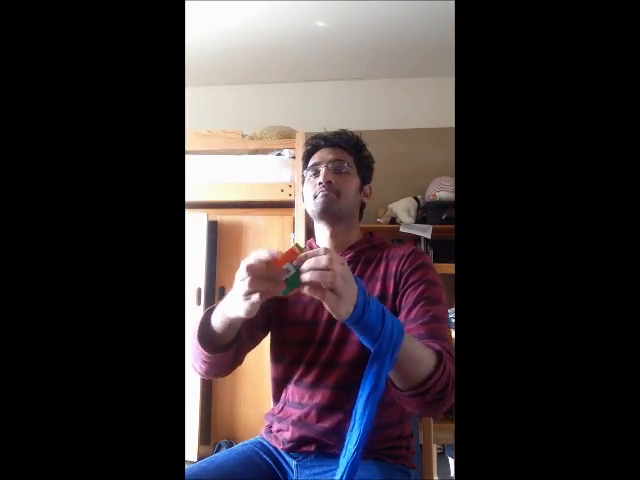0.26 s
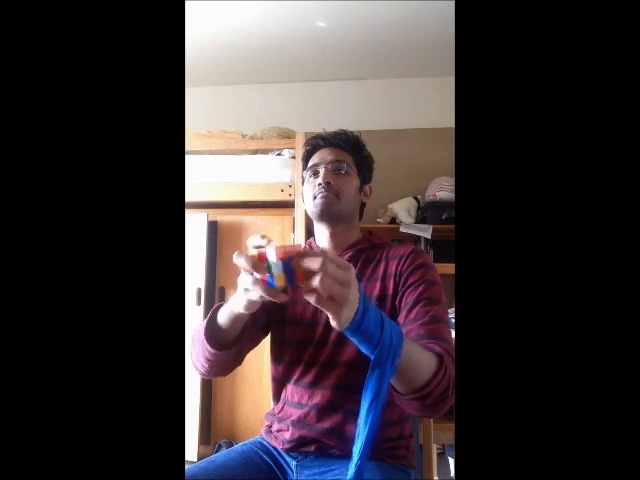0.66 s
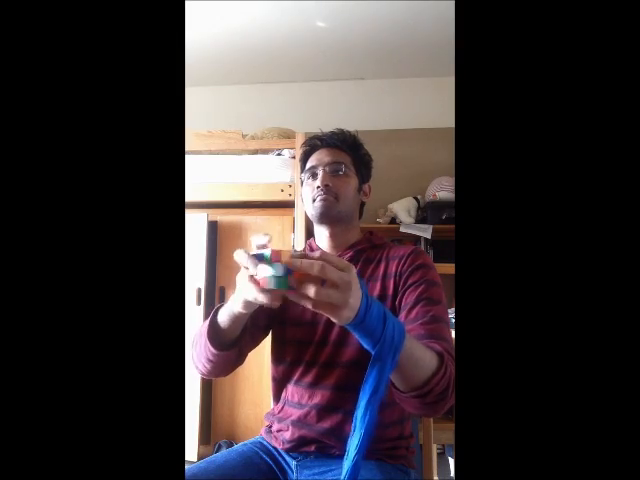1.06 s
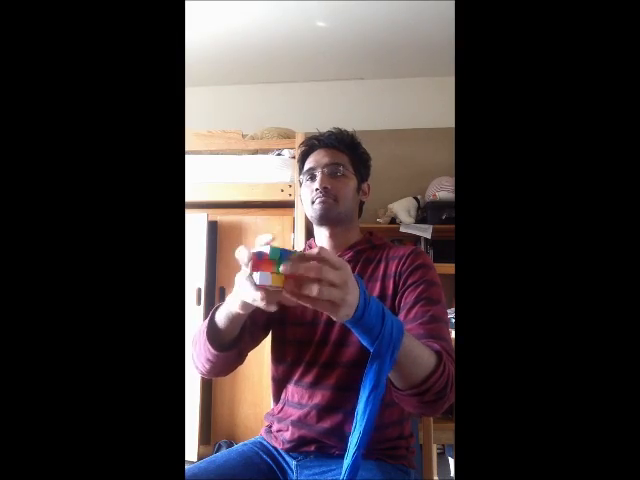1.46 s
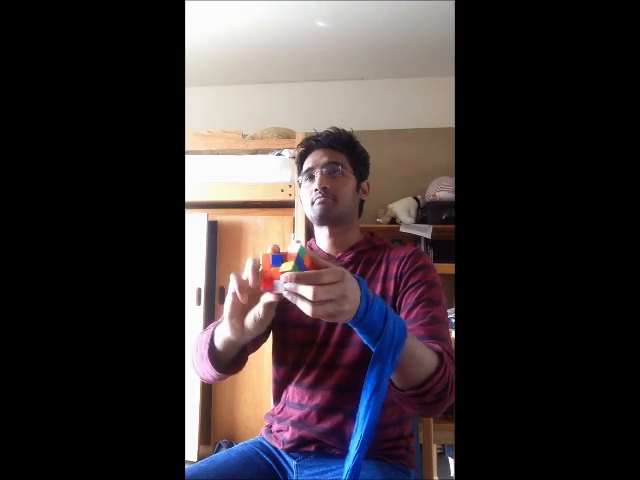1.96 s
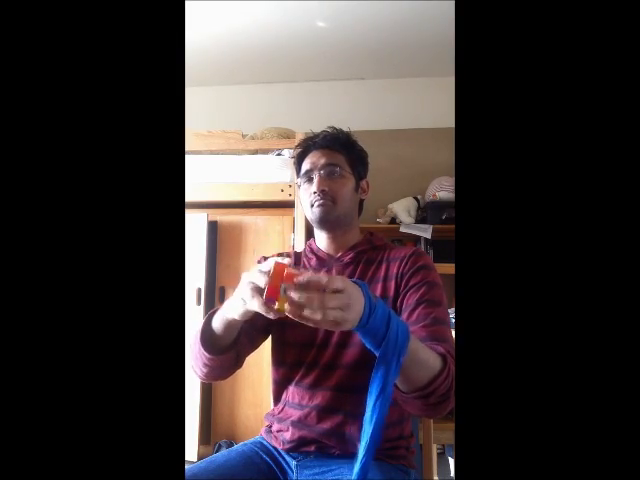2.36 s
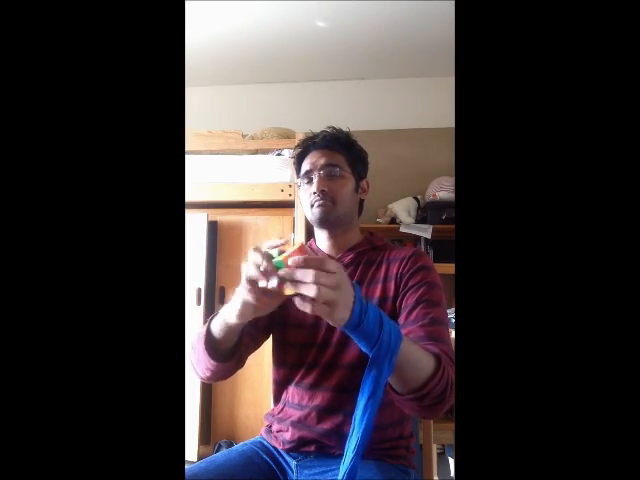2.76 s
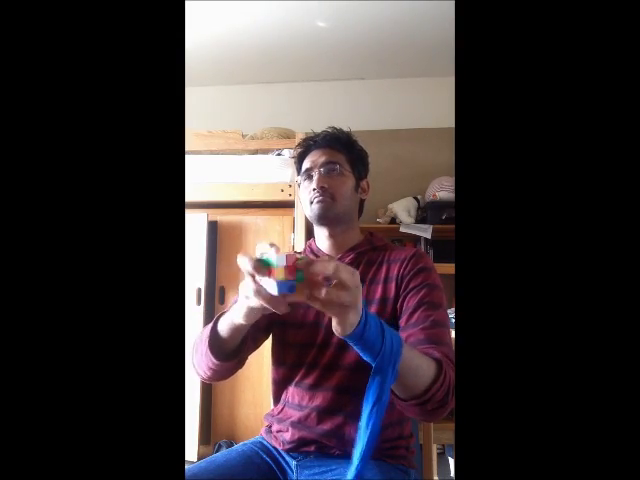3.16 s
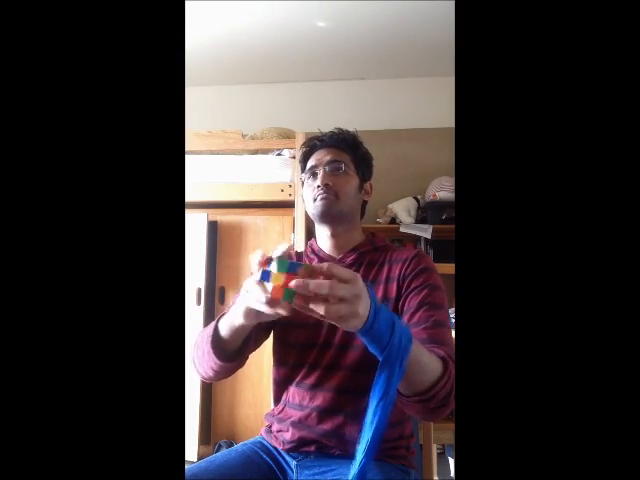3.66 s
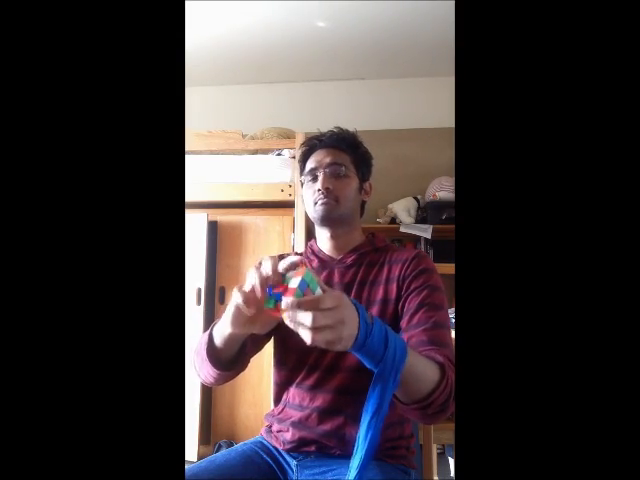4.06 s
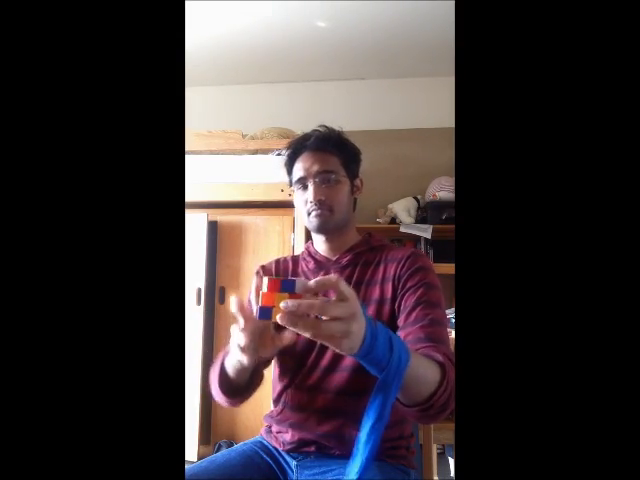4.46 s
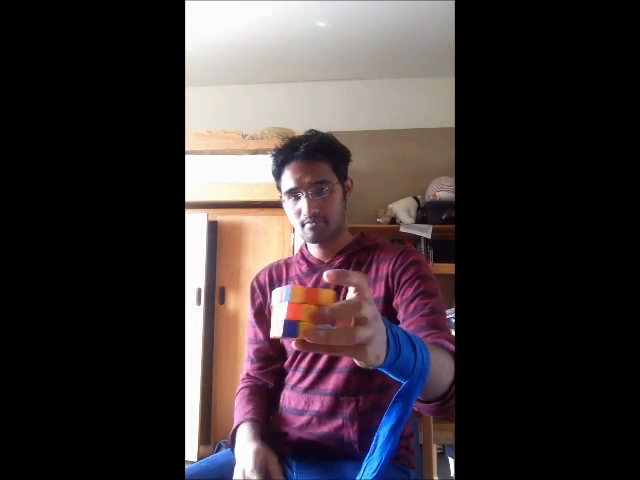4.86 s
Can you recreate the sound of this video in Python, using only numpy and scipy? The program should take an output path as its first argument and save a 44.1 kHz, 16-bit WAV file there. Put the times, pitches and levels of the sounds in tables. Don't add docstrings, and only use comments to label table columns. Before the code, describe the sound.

A hollow plastic puzzle cube is twisted quickly by hand about a metre from a phone in a small furnished room. It opens with two sharp ticks, then from 0.3 to 1.7 s come fast clusters of snaps, clacks and rattles with gritty sliding between them, strong at 0.6, 1.1 and 1.6 s. Around 1.8 to 2.25 s it thins to lighter clicks and finger touches. A very sharp tick lands at 2.45 s, followed by dense clacking to 2.95 s with a soft dull hand bump near 2.74. After a lighter pause, another hard burst comes at 3.5 to 3.8 s. Spaced locks follow, then one bright, loud clack at 4.72 s and small fading ticks to about 5 s. Thin spring pings appear occasionally, including a high one near 4.4 s. Close echoes and a short room tail blend into faint ventilation hum and steady hiss.

```python
import sys
import numpy as np
from scipy import signal
from scipy.fft import rfft, irfft
from scipy.io import wavfile
from scipy.ndimage import uniform_filter1d

SR = 44100
rng = np.random.default_rng(int(sys.argv[2]) if len(sys.argv) > 2 else 0)


def generate_wav(signal):
    frames = np.transpose(np.atleast_2d(signal))
    scaled = np.clip(frames, -1, 1) * 32767
    pcm = np.round(scaled).astype(np.int16)
    wavfile.write(sys.argv[1], SR, pcm)


def gain_from_db(level_db):
    decades = np.asarray(level_db, float) / 20
    return 10 ** decades


N = 225792


def shape(x, hz, db):
    log_hz = np.log(np.fft.rfftfreq(len(x), 1 / SR) + 1)
    return irfft(rfft(x) * gain_from_db(np.interp(log_hz, np.log(hz), db)), len(x))


def unit(x):
    return x / np.sqrt(np.mean(x ** 2))


def walk(rate):
    hold = int(SR / rate)
    steps = np.repeat(rng.standard_normal(N // hold + 1), hold)
    return unit(uniform_filter1d(uniform_filter1d(steps, hold), hold)[:N])


def fade(t, t60):
    return np.exp(-np.log(1000) * t / t60)


def add(out, s, x):
    i = max(int(s * SR), 0)
    out[i:i + len(x)] += x[:len(out) - i]


# f/Hz, density/dB per Hz
AIR_COLOUR = [(25, -32), (60, -21), (80, -25.5), (125, -8.5), (200, -5), (265, 2), (330, -3.5), (420, -7.5),
              (800, -10.5), (1300, -13), (2200, -18.5), (4000, -22.5), (9000, -22), (15000, -27)]
# f/Hz, level/dB
MOTOR_LINES = [(269.2, -71), (360.2, -73.5), (890, -75.5)]


def air():
    noise = unit(shape(rng.standard_normal(N), *np.transpose(AIR_COLOUR)))
    rumble = shape(noise, [500, 900], [0, -60])
    waver = gain_from_db(0.21 * walk(4.82)) - 1
    out = gain_from_db(-58.5) * (noise + rumble * waver)
    for hz, db in MOTOR_LINES:
        phase = 2 * np.pi * np.cumsum(hz * (1 + 0.00195 * walk(3.4))) / SR
        out = out + gain_from_db(db + 1.5 + 2 * walk(2.39)) * np.sin(phase)
    return out


# delay t/s, level/dB
NEAR_WALLS = [(.0028, -9.5), (.0046, -8.5), (.0082, -16.5), (0.013, -16.5)]
# f/Hz, t60/s, level/dB
ROOM_TAIL = [(477, 0.16, -28), (1296, 0.21, -32.5), (2850, 0.17, -31), (5550, 0.18, -32), (8660, 0.19, -35),
             (12900, 0.089, -34)]


def room(x, poses=6):
    t = np.arange(SR // 2) / SR
    hz = [band[0] for band in ROOM_TAIL]
    log_hz = np.log(np.fft.rfftfreq(len(t), 1 / SR) + 1)
    swell = 1 - np.exp(-t / 0.00071)
    pose = np.arange(N) // 1500 % poses
    out = x
    for k in range(poses):
        paths = np.zeros(len(t))
        scatter = rfft(rng.standard_normal(len(t)))
        for s, db in NEAR_WALLS:
            add(paths, s * (1 + .08 * rng.standard_normal()), gain_from_db(db) * np.array([.6, .4, -.3]))
        for j, (_, t60, db) in enumerate(ROOM_TAIL):
            share = np.interp(log_hz, np.log(hz), np.arange(len(hz)) == j)
            paths = paths + gain_from_db(db) * irfft(scatter * share, len(t)) * fade(t, t60) * swell
        sent = x * uniform_filter1d(1. * (pose == k), size=200)
        out = out + signal.fftconvolve(sent, paths)[:N]
    return out


# t/s, length/s, level/dB
HAND_BUMP = (2.738, .03, -50)
# f/Hz, level/dB
HAND_COLOUR = [(150, -28), (215, 1), (260, 3), (330, -27), (700, -16), (900, -4), (1100, -23), (1800, -9),
               (2400, -45)]


def bump():
    s, length, db = HAND_BUMP
    thud = unit(shape(rng.standard_normal(N), *np.transpose(HAND_COLOUR)))
    swell = np.exp(-((np.arange(N) / SR - s) / length) ** 2)
    return gain_from_db(db) * swell * thud


# t/s, f/Hz, level/dB, t60/s
SPRING_PINGS = [
    (.01, 9490, -56, .2),
    (4.415, 9290, -58, .6),
    (4.415, 8620, -60, .2),
    (4.72, 7700, -54, .2),
    (2.313, 2250, -51, .2),
    (2.93, 3750, -46, .1),
    (.508, 2250, -45, .1),
    (2.28, 2200, -54, .2),
    (1.346, 2200, -44, .05),
]


def springs():
    out = np.zeros(N)
    t = np.arange(int(.115 * SR)) / SR
    for s, hz, db, t60 in SPRING_PINGS:
        add(out, s, gain_from_db(db) * fade(t, t60) * np.sin(2 * np.pi * hz * t))
    return out


# t/s, rise by 10 dB/ms, fall by 10 dB/ms, level/dB, brightness/dB
LAYER_TWISTS = [(.01, 21, 300, -51.5, -1.5), (.5, 90, 100, -54, 3), (.635, 15, 80, -48.5, 2),
                (0.752, 92, 28, -51, 3.5), (.96, 53, 64, -49, 3), (.855, 8, 60, -61, -1),
                (1.16, 50, 65, -48, 4), (1.35, 6, 112, -46, 4), (1.61, 100, 95, -51, 3.5),
                (1.815, 25, 170, -54, 3), (2.32, 30, 80, -61, 7.5), (2.459, 16, 86, -51, 6.5),
                (2.555, 10, 60, -43, -2), (2.64, 60, 150, -55.5, -5), (2.938, 115, 63, -44, 1.5),
                (3.06, 50, 450, -60.5, 1), (3.52, 100, 80, -58, 5), (3.609, 35, 84, -48.5, 7),
                (3.761, 19, 102, -45, 3), (4.02, 53, 45, -49.5, -2.5), (4.2, 60, 209, -63.5, 2),
                (4.41, 26, 53, -61, 11.5), (4.73, 23, 49, -61.5, 15), (4.9, 15, 140, -66, 2)]


def twisting():
    s, rise, fall, level_db, bright_db = np.transpose(LAYER_TWISTS)[:, :, None]
    t = np.arange(0, N + 64, 64) / SR
    body_db = level_db - 10 ** 4 * np.maximum((s - t) / rise, (t - s) / fall)
    gains = []
    for db in (body_db, body_db + bright_db):
        total = np.sqrt(np.sum(gain_from_db(2 * db), axis=0))
        gains.append(np.interp(np.arange(N) / SR, t, total))
    return gains


def slide():
    slip_rate, size_db, flutter_db, smooth = 1000., 5., 2., .45
    body_gain, edge_gain = twisting()
    coin = rng.random((3, N))
    size = gain_from_db(-size_db * np.log(coin[2] + .05))
    slips = (coin[0] < slip_rate / SR) * np.sign(coin[1] - .5) * size
    grains = irfft(np.exp(2j * np.pi * rng.random((9, 25))))
    face = np.arange(N) // 97 % len(grains)
    slips = sum(signal.fftconvolve(slips * (face == k), grain)[:N] for k, grain in enumerate(grains))
    rub = (unit(slips) + smooth * rng.standard_normal(N)) * gain_from_db(flutter_db * walk(40))
    body = shape(rub, [400, 900, 1400, 2150, 2600, 3200, 4500, 6500],
                 [-2.5, -4.0, -2.0, 5.5, 0.5, 0.5, -3.5, -28.0])
    edge = shape(rub, [3960, 6950, 9150, 11300, 14800], [-14.5, -5.5, -10.5, -15, -12.5])
    return gain_from_db(-3.5) * (body_gain * unit(body) + edge_gain * unit(edge))


# t/s, peak level/dB, brightness/dB, rattle/dB
FACE_CLACKS = [(.331, -33.5, -2, -9), (3.4138, -39, -1, -14), (3.001, -37, 6, -10), (.4649, -28, 11, -4),
               (.6205, -23, 4.5, 0), (.6713, -29.5, -1, -13), (.9132, -23.5, -8, -5.5),
               (1.477, -34, 30.5, -13), (1.5375, -28.5, -4, -5), (1.5504, -28, 0, 0),
               (1.6114, -15, -2, -21), (1.729, -33.5, 8, -12), (2.3993, -31.5, -6.5, -6),
               (2.554, -21.5, 12, -13), (2.6423, -30.5, 5.5, 3), (2.8409, -31, -5.5, -0.5),
               (2.8706, -30.5, 3, -9), (2.9071, -28, 2, 0.5), (2.908, -28, 0, -11), (2.9291, -24, 3, -1),
               (2.9472, -23, -2, -1.5), (3.6023, -23, 8, 2), (3.7497, -21, 2, 2), (3.7793, -17, 4, -3),
               (3.8676, -34, 5, -18), (3.9384, -34, 4, -4), (4.7196, -15, 13, -19), (4.8853, -34, -1, -3),
               (4.9737, -33.5, -6, -9), (5.0533, -37, 2.5, -7)]
# t/s, peak level/dB, brightness/dB,
# rattle/dB
LAYER_LOCKS = [(.4875, -25.5, -6.5, -6), (.5077, -30, -8, 0), (.5511, -25, -1, -8), (.7427, -23, -0.5, -14),
               (.8449, -31, 0, -2.5), (1.0999, -20, 1, -4), (1.1006, -18.5, 0.5, 0), (1.1024, -21, 6.5, -6),
               (1.1414, -17, -9, -10), (1.1549, -21, -3, -2.5), (1.946, -28, -6.5, -16.5),
               (2.3124, -30.5, -5, -3), (2.8066, -33.5, 7, 2.5), (3.4863, -24, 2, -7.5),
               (3.533, -28, -1, 1.5), (3.7516, -17, 3.5, -0.5), (3.8269, -25, 2.5, -2),
               (4.0238, -30.5, -4, -4), (4.1773, -23, -4, -39.5), (4.3934, -27, 1, 4),
               (4.6767, -33.5, -6, -8), (4.6892, -32, -4, -10), (4.1614, -42, 5, -14),
               (4.358, -45.5, -12, -3), (4.2837, -39, -14, -9), (1.9053, -42, 16, -19), (4.067, -44, 8, -4),
               (2.0434, -46, 5, -16), (1.091, -39, -9, -2), (3.3123, -47, -1.5, -14)]
# t/s, peak level/dB, brightness/dB, rattle/dB
CORNER_TICKS = [(.0094, -21, 12, -26), (.0284, -21, 3.5, -29), (.398, -31, 9, -14),
                (.6625, -23.5, -8, -6.5), (.9382, -36.5, -34, 3.5), (.9507, -29.5, 20, 2.5),
                (.9622, -29, -4, -1.5), (1.1594, -33, -12, -23), (1.3457, -26.5, -10, -9),
                (1.3578, -27.5, 13, -17.5), (1.8028, -34, -16, -6), (1.8159, -30, -5, -18),
                (1.8574, -35.5, 3.5, 2.5), (2.2794, -33.5, 4, -2), (2.3201, -37, -4, -17),
                (2.3222, -25, -1.5, -6), (2.4459, -11.5, 7, -11), (2.602, -24.5, 0, 0.5),
                (2.6244, -28.5, -6, 1), (3.3406, -30, -5.5, -11), (3.3774, -26.5, 21, -4),
                (3.4575, -36, -3, 0), (3.5987, -22, -14, 1.5), (3.6244, -23.5, 0, -1.5),
                (3.798, -29.5, 9, 0), (4.3955, -29.5, -13, -6.5), (4.4144, -27, 14, -17.5),
                (4.9152, -38.5, 3, 0)]
# t/s, peak level/dB, brightness/dB
FINGER_TOUCHES = [(.1925, -48, -20), (0.432, -39.5, -6), (0.438, -35.5, -14), (.7107, -35, -15),
                  (.8245, -41, 4), (1.254, -37.5, 7), (1.443, -35, -17), (1.4981, -38, -11.5),
                  (1.5227, -34.5, -11), (1.706, -34, -1), (1.8273, -36, -3), (1.848, -34, -12),
                  (2.0007, -35, -4.5), (2.1112, -40.5, -19), (2.2212, -36, 0), (2.5494, -31, 6),
                  (2.7816, -51, 2.5), (3.07, -37, 4), (3.16, -40.5, -38), (3.2288, -37, -6),
                  (4.6274, -45, -2), (3.58, -36, -10), (3.9936, -36, -7), (4.008, -31, -11),
                  (3.726, -38.5, -28), (4.2757, -35.5, -2), (4.384, -37, -6), (4.5271, -42.5, 7),
                  (4.5435, -39, 1), (4.655, -41.5, -18)]


def blows():
    touches = [(*row, -8.5) for row in FINGER_TOUCHES]
    kinds = (FACE_CLACKS, -18), (LAYER_LOCKS, -10), (CORNER_TICKS, -4), (touches, -7.5)
    return [(*row, top_db) for rows, top_db in kinds for row in rows]


# f/Hz, t60/s, level/dB
PIECE_MODES = [(611, 0.0054, -11.5), (996, 0.026, -21), (1422, 0.023, -14), (1800, 0.0035, -3),
               (2105, 0.0071, 1.5), (2500, 0.0065, -0.5), (3175.6, 0.008, 1.5), (3800, 0.0056, 4),
               (4490, 0.0047, 5), (5243, 0.005, 4.5), (5980, 0.0058, 2.5), (6260, 0.0043, 3),
               (7704, 0.0038, 5), (8430, 0.0044, 2), (9220, 0.0063, 1), (10280, 0.0042, 3.5),
               (10500, 0.0013, -16), (11910, 0.0023, 12.5), (14250, 0.0021, 13), (15000, 0.0021, 9)]
COLOUR_HZ = [2200, 4800, 8400, 12800]


def snaps():
    scatter_db, detune = 2.0, 0.048
    crack_db, crack_s = 8.0, 0.0029
    rattle_s, rattle_rate, size_db = 0.088, 900., 4.5
    hz, t60, db = np.transpose(PIECE_MODES)[:, :, None]
    t = np.arange(600) / SR
    late = np.arange(3500) / SR
    out = np.zeros(N)
    for s, peak_db, bright_db, rattle_db, top_db in blows():
        weight, pitch, phase = rng.standard_normal((3, 3, len(hz), 1))
        chance, size = rng.random((2, 2, len(late)))
        tilt = [-bright_db, -bright_db / 2 - 3.5, 0, top_db]
        colour_db = np.interp(np.log(hz), np.log(COLOUR_HZ), tilt)
        turn = 2 * np.pi * hz * (1 + detune * pitch) * t + 2 * phase
        level = gain_from_db(db + colour_db + scatter_db * weight)
        rings = np.sum(level * fade(t, t60) * np.sin(turn), axis=1)
        crack = rng.standard_normal((3, len(t))) * fade(t, crack_s)
        crack_colour = (colour_db - 5.5 * (hz > 10500))[:, 0]
        rings = rings + gain_from_db(crack_db) * np.array([shape(row, hz[:, 0], crack_colour) for row in crack])
        rings = rings * (1 - np.exp(-t / 0.00044)) ** 2
        rings = gain_from_db(peak_db - 0.5) * rings / np.max(np.abs(rings[0]))
        add(out, s, rings[0])
        knock_size = gain_from_db(rattle_db - 14 - size_db * np.log(size + .03))
        knocks = (chance < rattle_rate / SR) * knock_size * fade(late, rattle_s)
        add(out, s, signal.fftconvolve(knocks, rings[1:], axes=1).sum(axis=0))
    return out


def scene():
    no_bass = signal.butter(3, 480, "high", fs=SR, output="sos")
    cube = signal.sosfilt(no_bass, snaps() + slide())
    return (room(cube + springs()) + bump() + air())[None]


def roll_off(x):
    return signal.sosfilt(signal.butter(12, 16520, fs=SR, output="sos"), x)


def record(dry):
    low = shape(dry[0], [15250, 15600], [0, -70])
    top = shape(dry[0], [15400, 15500, 15800, 16600, 16600], [-70, -30, -22, -22, -64])
    power = top ** 2
    sudden = uniform_filter1d(power, size=300) > 3. * uniform_filter1d(power, size=3000)
    gate = uniform_filter1d(1. * sudden, size=100)
    return roll_off((low + top * gate)[None])


dry = scene()
out = record(dry)
generate_wav(out)
```